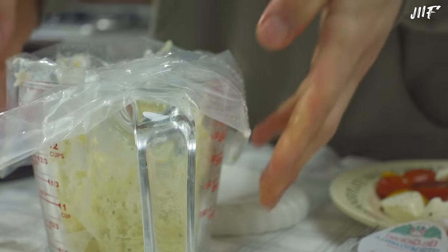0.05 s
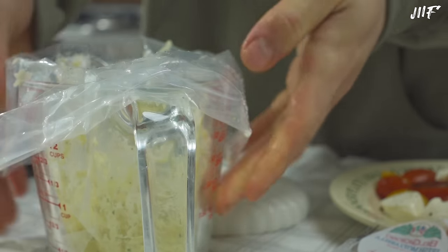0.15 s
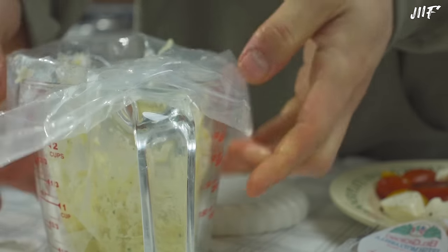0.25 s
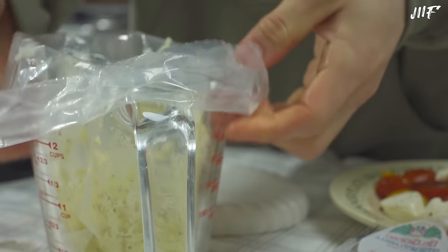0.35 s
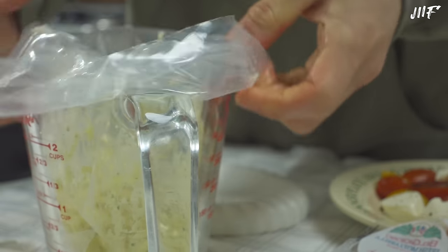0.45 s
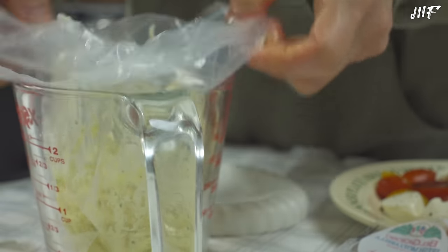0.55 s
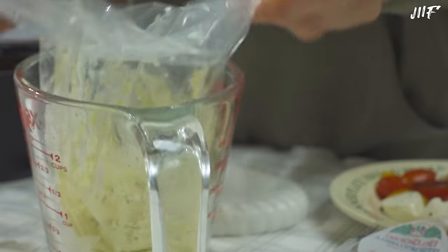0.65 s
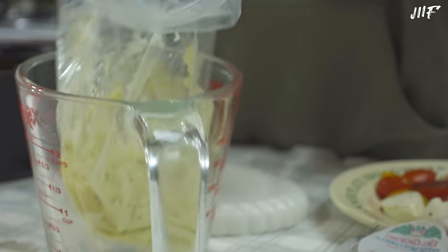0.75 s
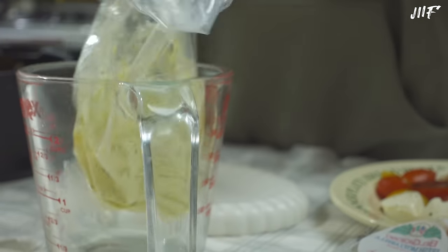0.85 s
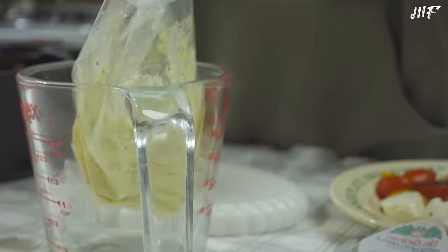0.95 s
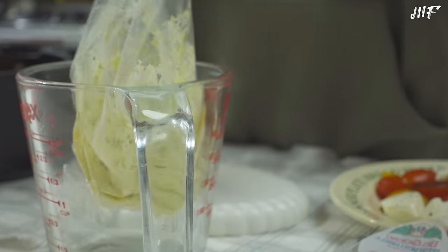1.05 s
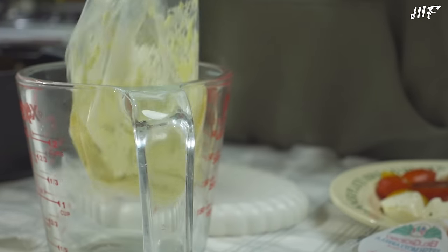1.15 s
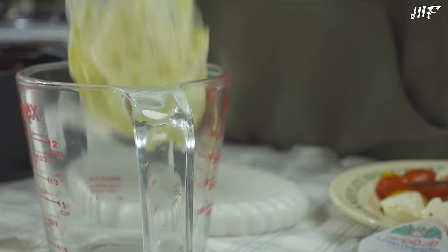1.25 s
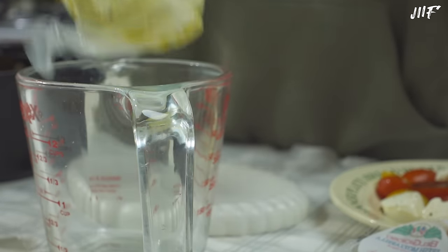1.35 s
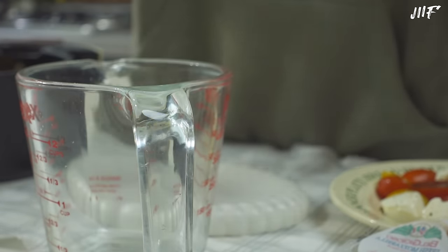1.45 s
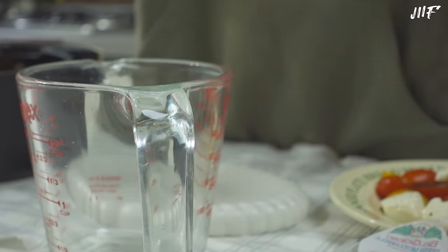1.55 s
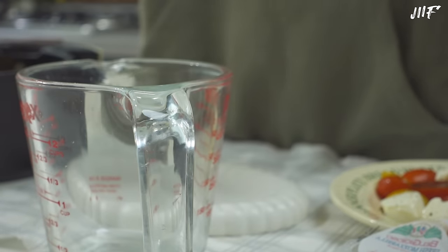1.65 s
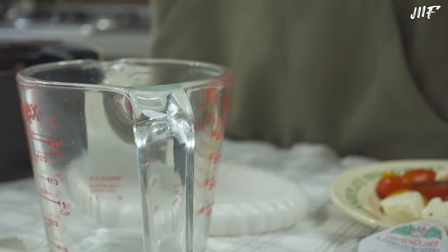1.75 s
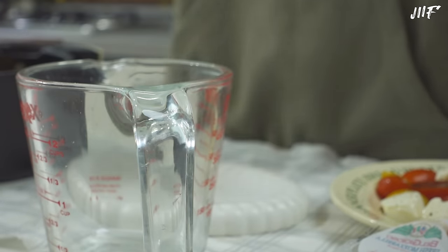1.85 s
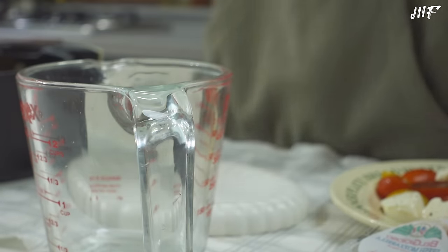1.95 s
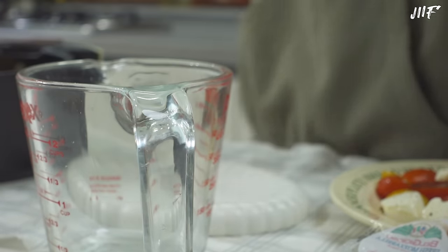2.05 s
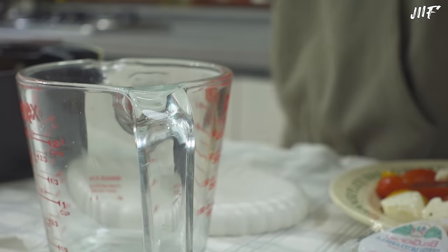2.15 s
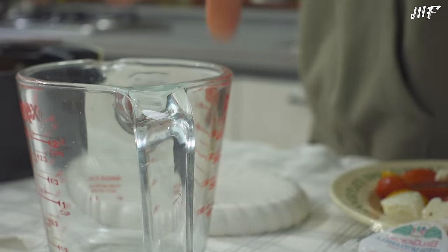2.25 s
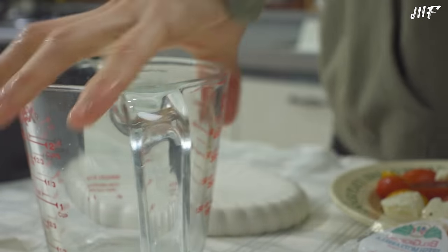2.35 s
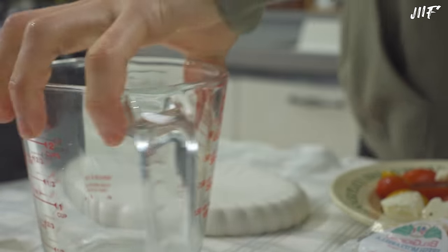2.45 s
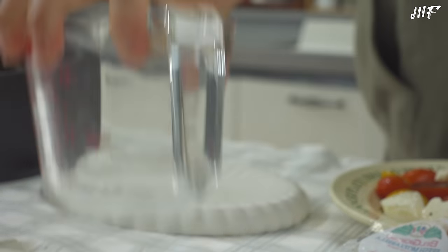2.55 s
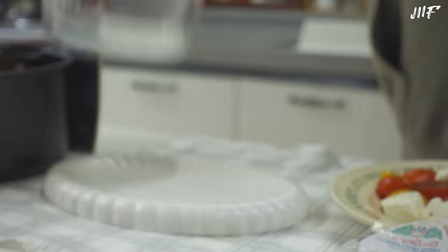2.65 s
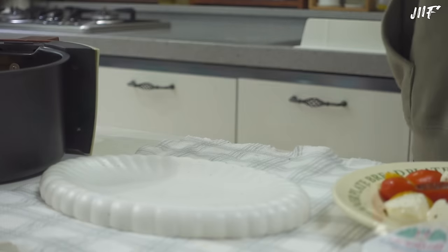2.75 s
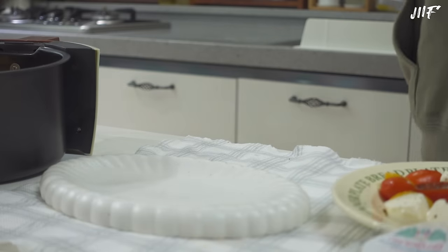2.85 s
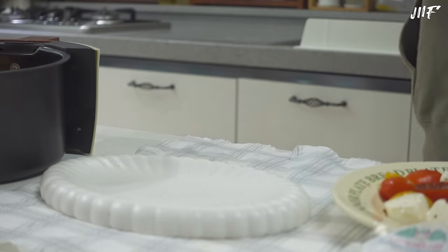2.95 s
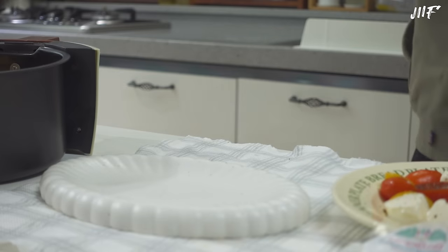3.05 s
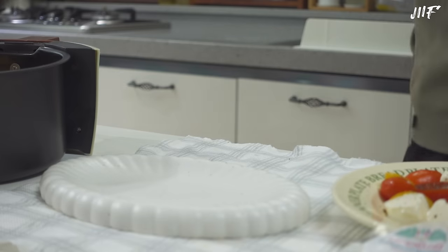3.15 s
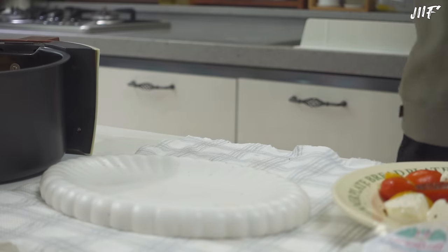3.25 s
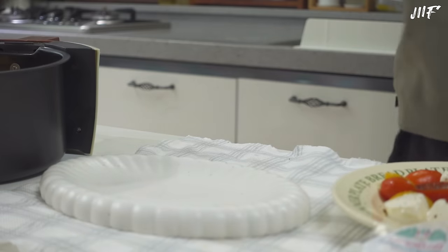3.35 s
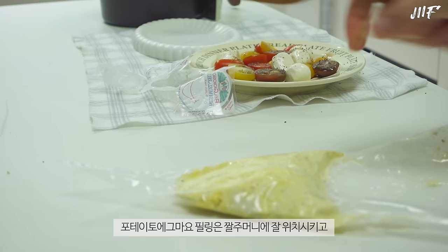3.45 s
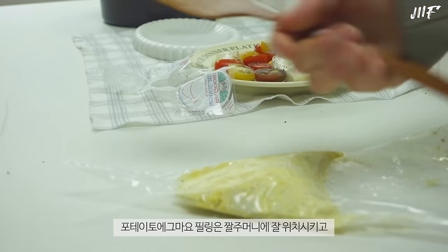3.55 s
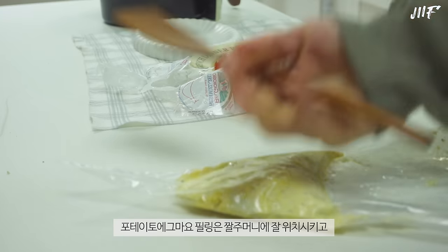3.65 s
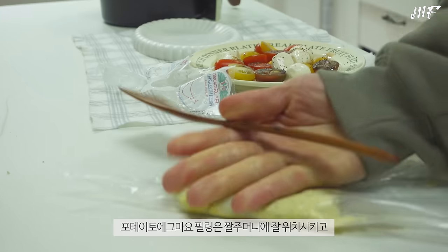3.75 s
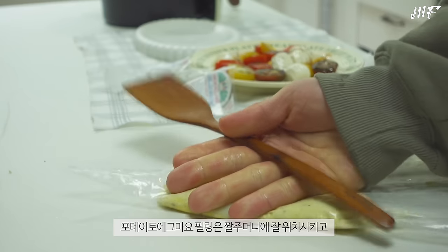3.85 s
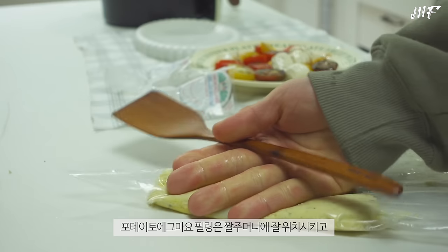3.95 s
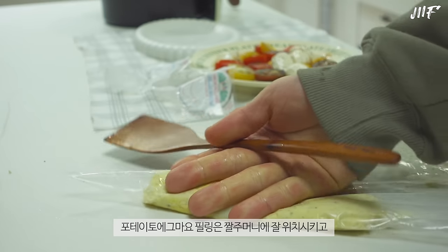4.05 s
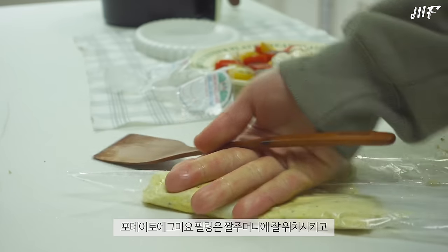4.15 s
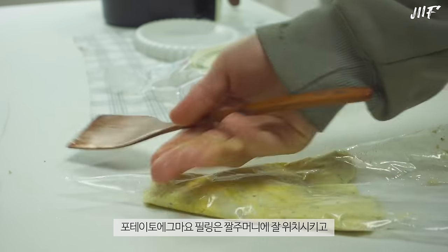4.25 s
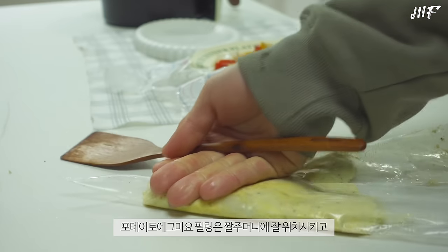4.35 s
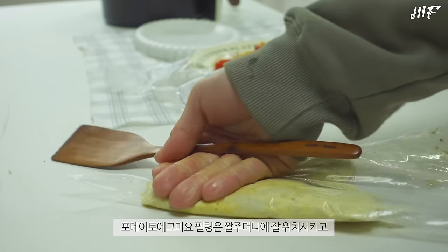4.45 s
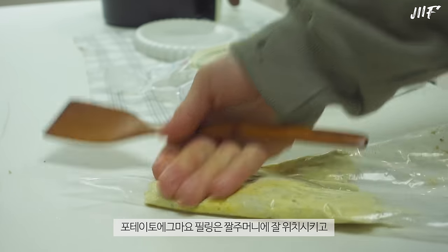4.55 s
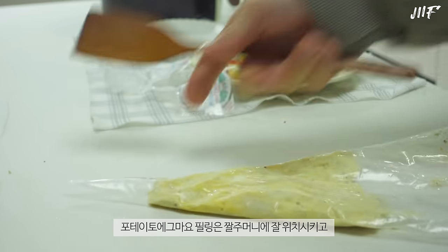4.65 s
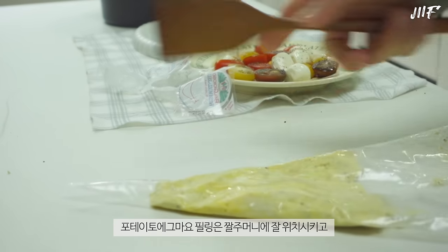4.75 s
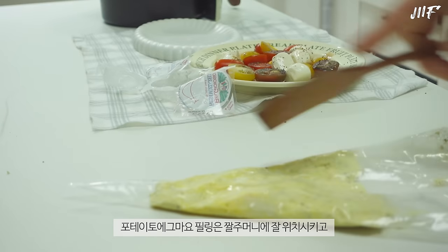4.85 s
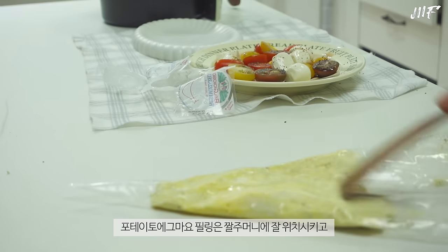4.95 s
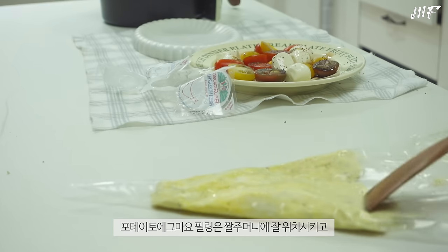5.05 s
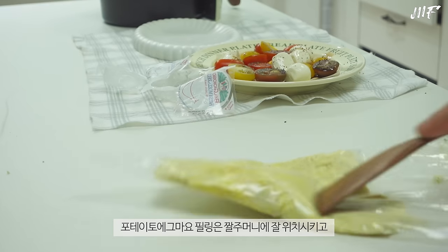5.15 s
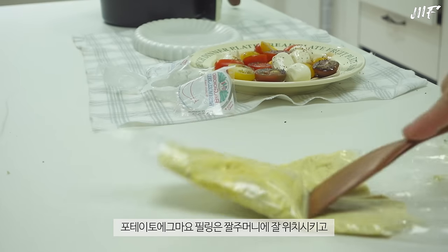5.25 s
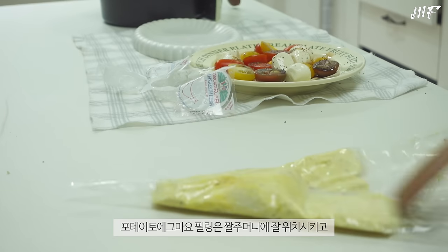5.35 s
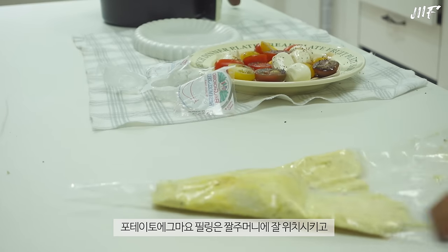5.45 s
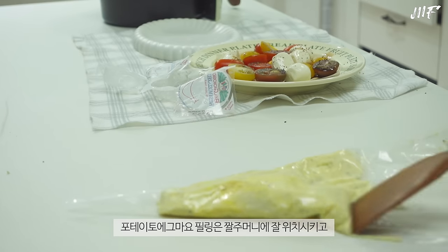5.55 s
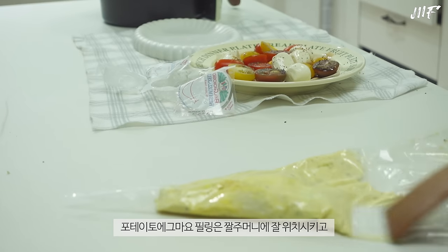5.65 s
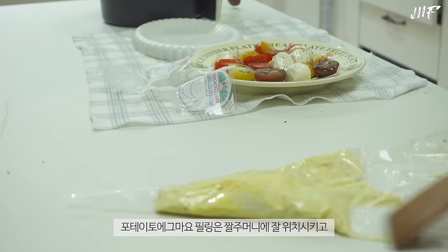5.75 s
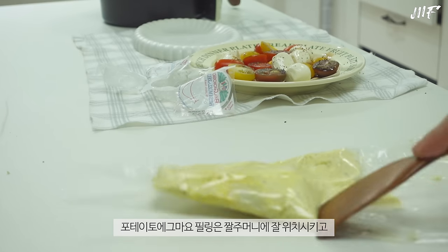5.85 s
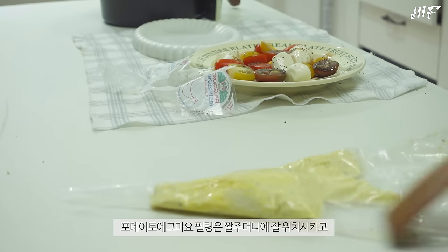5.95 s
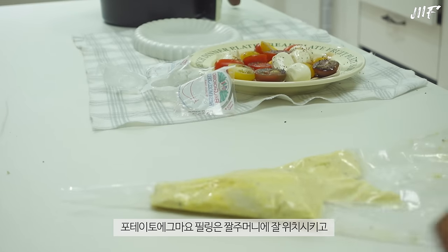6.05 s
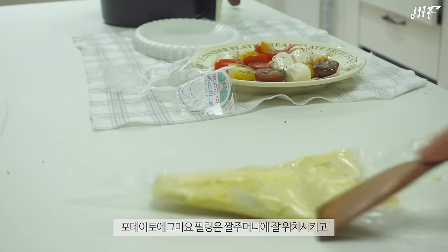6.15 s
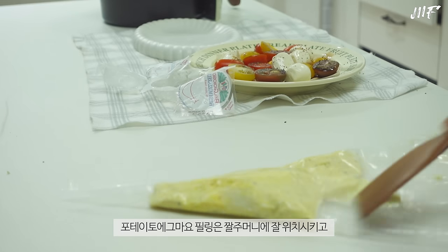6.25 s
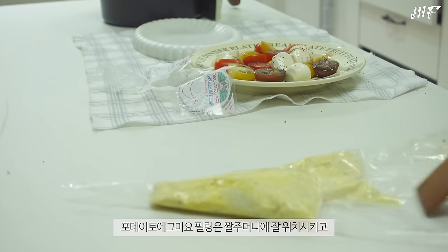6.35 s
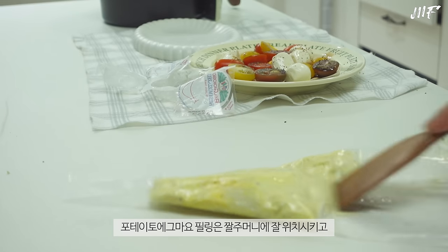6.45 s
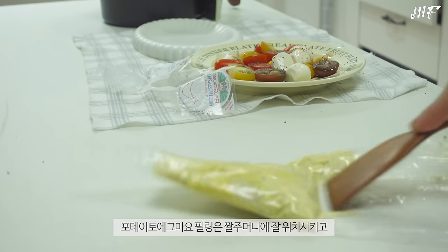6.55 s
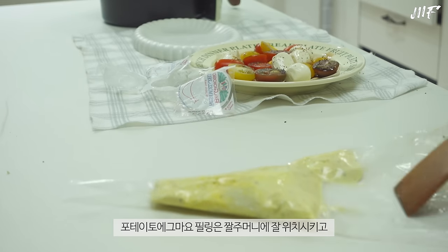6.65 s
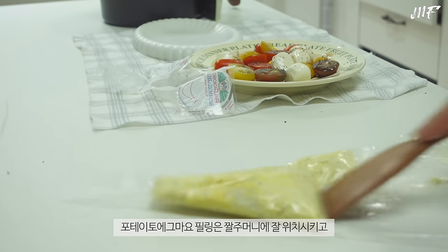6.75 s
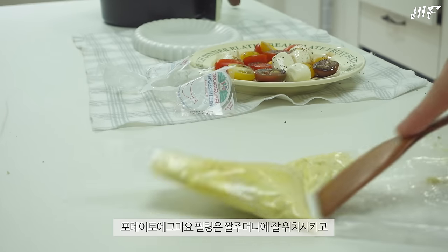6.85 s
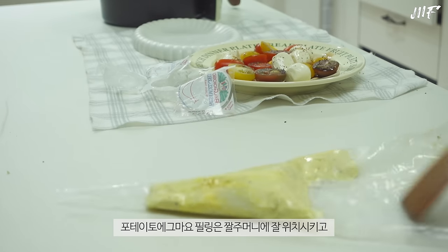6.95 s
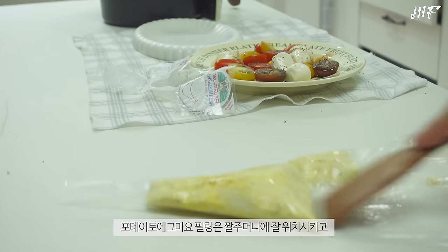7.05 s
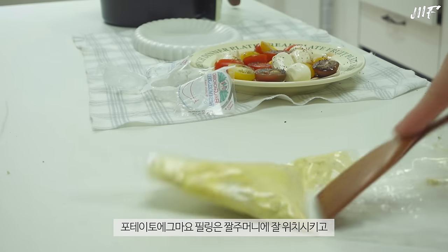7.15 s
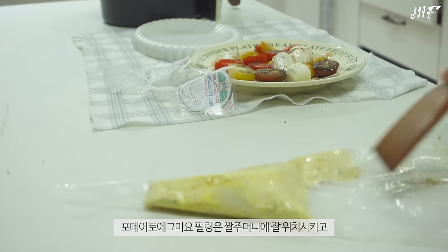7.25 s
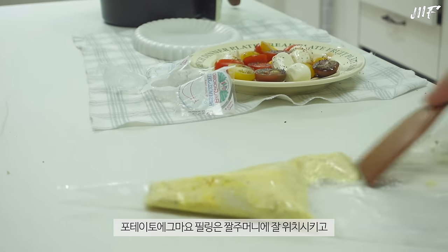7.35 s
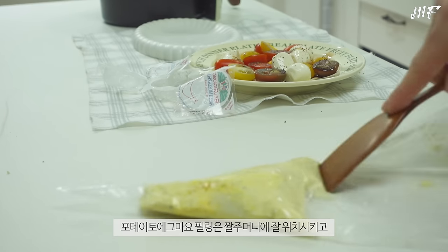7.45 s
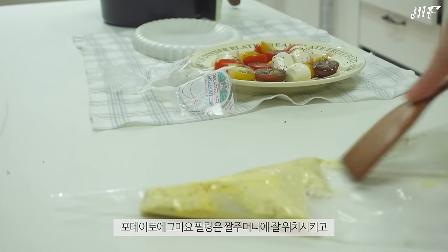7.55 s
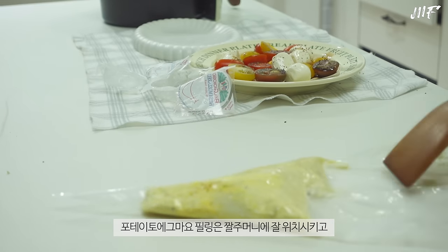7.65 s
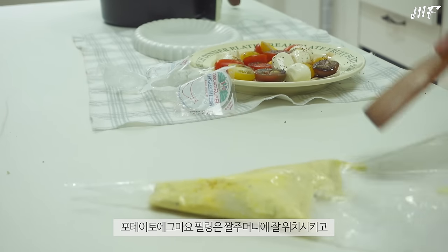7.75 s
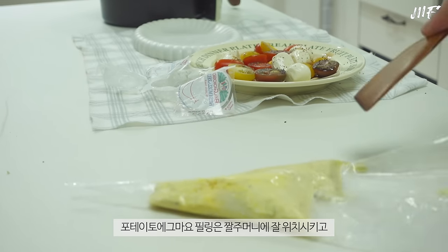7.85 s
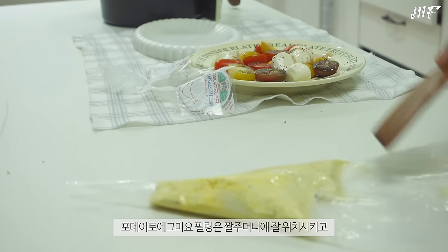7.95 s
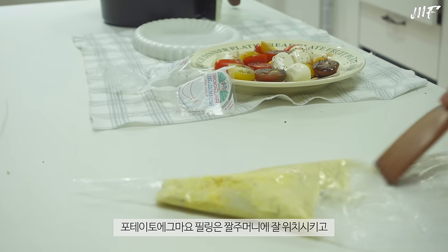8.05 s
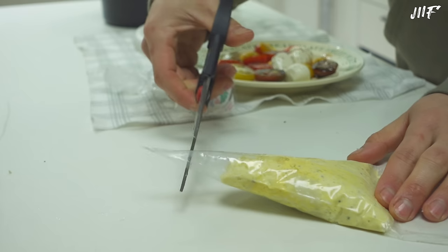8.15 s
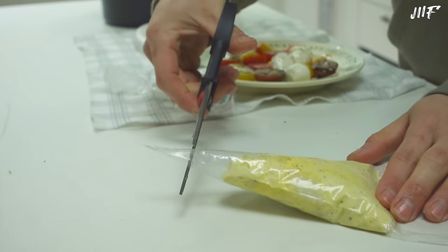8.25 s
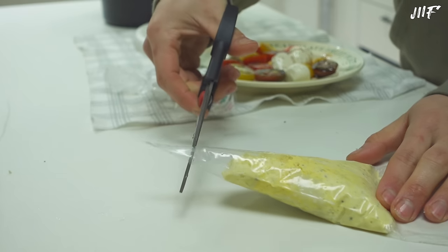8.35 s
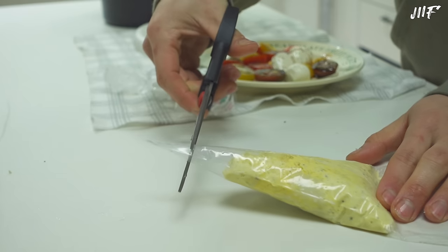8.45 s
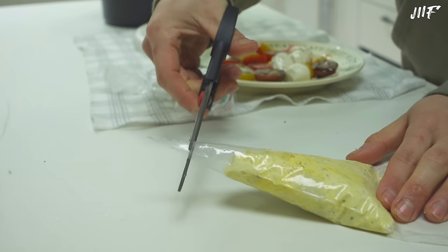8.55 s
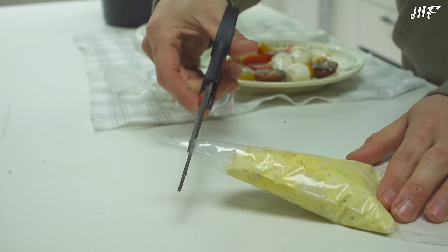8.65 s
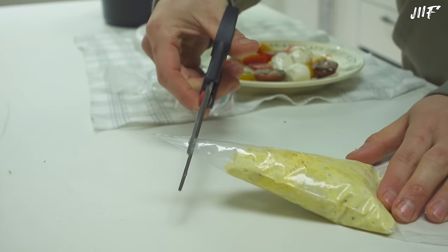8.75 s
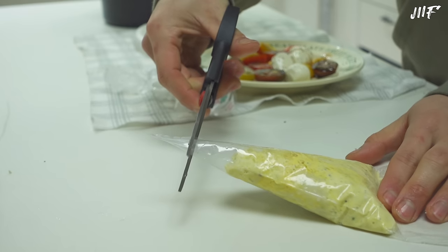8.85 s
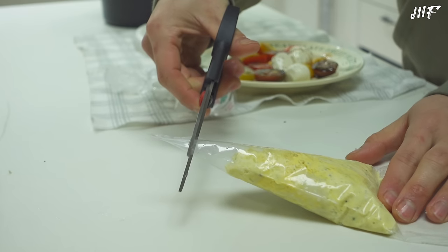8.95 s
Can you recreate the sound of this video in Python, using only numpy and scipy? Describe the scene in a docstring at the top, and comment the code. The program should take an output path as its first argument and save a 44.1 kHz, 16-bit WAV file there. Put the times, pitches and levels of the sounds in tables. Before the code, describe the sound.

In a small, lightly reverberant kitchen, a close microphone catches crisp film crackling and dull rubbing as a filled bag leaves a jug. A lull follows with a few lone ticks and a brief cloth swish. The bag then crinkles under a patting hand, and a spatula squeezes it along the table in separate rustling scrapes, tiny squeaky rasps and soft knocks, before near silence.

```python
"""Sharp snaps over a bed of fine crinkles: a thin plastic piping bag of soft filling leaves a glass jug.
A hand then pats it flat on a kitchen table and a wooden spatula pushes the filling in short strokes.
Snaps are short cracks with ringing facets; crinkles and rubs are clouds of tiny damped rings.
Padded knocks, narrow noise rasps, a cloth swish and a faint jug rub join in; noise tails make the small room."""
import sys
import numpy as np
from scipy import signal
from scipy.fft import rfft, irfft
from scipy.io import wavfile
from scipy.ndimage import map_coordinates

SR = 44100
rng = np.random.default_rng(int(sys.argv[2]) if len(sys.argv) > 2 else 0)


def master_out(mix):
    """Clip the mix to full scale and print it as 16-bit PCM to the path in sys.argv[1]."""
    frames = np.transpose(np.atleast_2d(mix))
    ceiling = np.clip(frames, -1, 1)
    pcm = np.round(ceiling * 32767).astype(np.int16)
    wavfile.write(sys.argv[1], SR, pcm)


N = 396900
TIME = np.arange(N) / SR

# Steady room hush. Each row: time in seconds, mid level in dB.
HUSH_LEVEL = [(0, -55.5), (2, -56.5), (4.8, -53.5), (8.2, -57), (9, -60)]
# Hush spectrum. Each row: frequency in Hz, relative density in dB.
HUSH_SPECTRUM = [(18, -64), (30, -28), (98, -46), (120, -9), (165, -13.5), (203, -10.5), (335, -9),
                 (413, -7), (459, -7), (551, -6), (612, 0), (907, -0.5), (1120, 1.5), (14600, -12.5),
                 (15800, -12)]
# The jug moves off the cloth. Each row: full force in seconds, rise in seconds, hold in seconds, level in dB.
JUG_STROKES = [(2.72, 0.18, 0.071, -60)]
# The sleeve sweeps past. Each row: full force in seconds, rise in seconds, hold in seconds, level in dB.
SLEEVE_STROKES = [(2.97, 0.2, 0.046, -41.5), (3.05, 0.12, 0.15, -48.5), (3.28, 0.19, 0.07, -46),
                  (3.386, 0.012, 0.064, -47)]
# Cloth spectrum. Each row: frequency in Hz, relative gain in dB.
CLOTH_SPECTRUM = [(530, -29), (900, -13), (1740, 3.5), (2410, 1), (2810, 1.5), (8170, 2.5), (14500, -6.5),
                  (15800, -8)]
# Modes of spatula on table top. Each row: frequency in Hz, width in Hz, relative level in dB.
TABLE_MODES = [(387, 22, 1), (479, 36, 0), (660, 60, -7), (867, 50, 0), (975, 45, -4), (1115, 32, 2),
               (1556, 45, -1)]
# Soft blows of bag, hand and spatula. Each row: time in seconds, relative peak in dB, pitch in Hz.
BLOWS = [(0.841, -21.5, 410), (0.941, -25, 474), (1.01, -24.5, 520), (4.296, -26, 1000), (5.06, -33, 825),
         (5.09, -30, 655), (5.503, -27.5, 440), (5.808, -24, 454), (6.143, -17.5, 457), (6.363, -29, 470),
         (6.421, -20, 510), (6.423, -13.5, 880), (6.714, -22, 510), (6.788, -30.5, 328), (7.002, -28, 490),
         (7.349, -10, 1020), (7.616, -21, 1190), (7.794, -27, 1360), (8.039, -24.5, 482)]
# Taut film slipping. Each row: start in seconds, rise in seconds, fall in seconds, pitch in Hz, level in dB.
FILM_RASPS = [(0.24, 0.048, 0.04, 8000, -44.5), (0.211, 0.07, 0.054, 1640, -51),
              (0.2, 0.051, 0.06, 4860, -50.5), (0.536, 0.0094, 0.02, 4160, -25),
              (1.16, 0.022, 0.025, 3540, -31), (2.325, 0.016, 0.043, 1890, -41.5),
              (4.129, 0.0017, 0.028, 9400, -33.5), (4.128, 0.004, 0.032, 4900, -24.5),
              (4.358, 0.002, 0.054, 4300, -23.5), (4.357, 0.0017, 0.069, 7900, -27.5),
              (4.955, 0.019, 0.025, 3670, -28), (5.333, 0.003, 0.049, 3300, -44),
              (5.464, 0.029, 0.028, 1700, -32), (5.799, 0.02, 0.025, 2330, -38),
              (6.094, 0.038, 0.037, 2640, -27.5), (6.135, 0.047, 0.039, 1790, -27.5),
              (6.447, 0.026, 0.028, 2740, -36), (6.727, 0.039, 0.04, 2617, -30),
              (7.015, 0.029, 0.023, 900, -37), (7.05, 0.034, 0.031, 2560, -30),
              (7.347, 0.0014, 0.038, 3160, -25), (8.087, 0.025, 0.025, 3000, -26.5)]
# Pulls out of the jug. Each row: full force in seconds, rise in seconds, hold in seconds,
# then relative levels in dB of dull rub, crinkle and fine fizz.
LIFT_STROKES = [(0.303, 0.035, 0.0067, -49, -38, -40), (0.365, 0.054, 0.015, -43, -32.5, -44),
                (0.435, 0.045, 0.015, -37.5, -35, -42), (0.545, 0.091, 0.044, -42, -33.5, -28),
                (0.652, 0.072, 0.017, -38.5, -31, -24.5), (0.75, 0.15, 0.066, -42, -34, -37),
                (0.845, 0.06, 0.11, -46.5, -32, -31), (1.01, 0.061, 0.0096, -57, -32, -26),
                (1.085, 0.033, 0.11, -42, -31, -28), (1.222, 0.068, 0.0055, -43.5, -27.5, -24)]
# The hand lays the bag down and pats it. Each row: full force in seconds, rise in seconds, hold in seconds,
# then relative levels in dB of dull rub, crinkle and fine fizz.
PAT_STROKES = [(2.17, 0.1, 0.14, -76, -57, -68), (2.333, 0.014, 0.027, -66, -57, -43.5),
               (2.505, 0.1, 0.14, -68, -59, -63.5), (3.743, 0.032, 0.0065, -54, -44, -39),
               (3.835, 0.09, 0.014, -57, -43.5, -51), (3.923, 0.18, 0.059, -49, -38, -54),
               (4.137, 0.035, 0.029, -43.5, -44, -40), (4.297, 0.0044, 0.0017, -51, -37, -36),
               (4.36, 0.0024, 0.047, -40, -28.5, -43), (4.571, 0.034, 0.038, -47, -38.5, -44)]
# Spatula strokes. Each row: full force in seconds, rise in seconds, hold in seconds,
# then relative levels in dB of dull rub, crinkle and fine fizz.
SCRAPE_STROKES = [(4.942, 0.046, 0.016, -55, -30.5, -41), (5.099, 0.03, 0.071, -46.5, -35.5, -35.5),
                  (5.415, 0.011, 0.009, -43, -36.5, -48), (5.494, 0.05, 0.066, -45, -33.5, -35.5),
                  (5.66, 0.089, 0.036, -48, -42.5, -42), (5.808, 0.073, 0.013, -35.5, -33.5, -36.5),
                  (5.998, 0.2, 0.01, -53, -39, -37), (6.118, 0.075, 0.047, -31.5, -27.5, -31),
                  (6.365, 0.0093, 0.013, -33, -34.5, -45), (6.424, 0.036, 0.056, -39, -29.5, -36.5),
                  (6.623, 0.13, 0.02, -53, -40, -41), (6.771, 0.13, 0.011, -37.5, -32, -36.5),
                  (7.078, 0.083, 0.01, -42, -32, -34), (7.349, 0.021, 0.069, -37, -33.5, -32.5),
                  (7.492, 0.15, 0.041, -42.5, -36.5, -45), (7.611, 0.062, 0.037, -43, -31, -34.5),
                  (7.713, 0.025, 0.015, -41, -34, -44), (8.012, 0.072, 0.14, -41, -31.5, -35.5)]
# Film spectrum in the jug. Each row: frequency in Hz, relative gain in dB.
JUG_SPECTRUM = [(59, -71), (100, -55), (153, -32), (259, -31), (314, -14.5), (356, -14.5), (593, 3),
                (849, -2.5), (1300, 1), (1860, 6.5), (3090, 2), (4820, -3.5), (5960, -7.5), (14200, -18),
                (15800, -16)]
# Film spectrum on the table. Each row: frequency in Hz, relative gain in dB.
TABLE_SPECTRUM = [(59, -57), (100, -54), (380, -15.5), (748, -6), (814, 2), (944, -11), (1190, -1),
                  (1380, -2), (4430, -3), (6630, -9), (8190, -8.5), (15800, -32)]
# Film spectrum under the spatula. Each row: frequency in Hz, relative gain in dB.
SPATULA_SPECTRUM = [(59, -56), (100, -31.5), (185, -20), (301, -17), (380, -7), (413, -6), (479, -3.5),
                    (717, -4), (868, 2.5), (1190, -1.5), (1570, 3), (3160, 2), (8550, -6), (15800, -15)]
# Loudest and lone creases buckling. Each row: time in seconds, level over 2 ms in dB, pitch in Hz,
# room answer in dB relative to the crack.
CREASE_SNAPS = [(0.3043, -14, 6980, -8), (0.3585, -21.5, 4280, 2.5), (0.3945, -21, 3200, -18),
                (0.4163, -16.5, 4650, -4.5), (0.453, -19, 5330, -10), (0.4752, -13.5, 4220, -13),
                (0.4845, -14, 5020, -8.5), (0.5492, -14, 5040, -21), (0.609, -13, 7160, -13),
                (0.6163, -14, 5300, 0), (0.7367, -14, 5796, -5.5), (0.7772, -14.5, 5740, -4.5),
                (0.8182, -14.5, 8500, -14), (0.8408, -12.5, 4040, -1.5), (0.8649, -10.5, 5150, -4),
                (0.895, -10.5, 5450, -6), (0.987, -14, 4300, -23), (1.0306, -22.5, 4940, -16),
                (1.0909, -13.5, 4670, -20), (1.1096, -17, 5500, -5), (1.1309, -22, 3770, -1),
                (1.1593, -22, 5400, -8), (1.1768, -13, 6100, -14), (1.1875, -17, 3870, -15),
                (1.202, -18, 3650, -8), (1.2525, -17, 2880, -22), (1.457, -19, 4370, -9.5),
                (1.7864, -25, 5100, -9.5), (2.0274, -35.5, 4800, -8), (2.0936, -25.5, 3770, -6),
                (2.0986, -33.5, 2140, -2), (2.3133, -37, 4970, 1), (2.332, -32.5, 2140, 7.5),
                (3.52, -33, 2350, -1.5), (3.7213, -29, 3160, -4), (3.7395, -20, 3120, -2),
                (3.756, -20.5, 6000, -13), (3.819, -22.5, 5400, -6.5), (3.8399, -23, 2360, -19),
                (3.8891, -18.5, 4620, -7.5), (3.9166, -23, 2280, -17), (3.947, -15.5, 2690, -20),
                (3.9605, -24, 2280, -9), (4.0552, -16, 4080, -3), (4.1283, -13.5, 6300, -1.5),
                (4.2431, -16, 4300, -6), (4.2999, -18, 2580, -24), (4.3374, -25, 2840, -23),
                (4.3585, -14.5, 5000, 1.5), (4.5686, -22, 6600, -16), (4.5981, -19.5, 2630, -3.5),
                (4.8846, -34.5, 2820, -6), (4.9196, -20, 2930, -12), (4.9312, -27, 2260, 4),
                (4.9561, -18.5, 4230, -4), (4.9775, -15.5, 3900, -2.5), (5.0632, -24.5, 2800, -10),
                (5.0949, -16.5, 3080, 1.5), (5.1222, -15.5, 3100, -16), (5.141, -18.5, 4200, -15),
                (5.172, -20, 3780, -13), (5.1924, -15.5, 4760, -2.5), (5.3322, -28, 3870, -6),
                (5.413, -23.5, 3070, -0.5), (5.5024, -14.5, 4280, -3), (5.5298, -14.5, 2980, -14),
                (5.56, -14, 4800, -4.5), (5.71, -17, 8920, -1), (5.957, -23, 2660, -14),
                (6.004, -22, 3303, -8), (6.1705, -14, 2350, -19.5), (6.2766, -27.5, 4630, -3.5),
                (6.3541, -17.5, 4930, -2), (6.364, -14.5, 1950, -1.5), (6.4738, -24, 2800, 2.5),
                (6.6205, -23.5, 3920, -1.5), (6.8283, -25.5, 4400, 0), (6.919, -23, 4440, -6.5),
                (6.97, -27.5, 3660, -14), (7.0807, -17, 6950, -5), (7.2129, -33.5, 5270, -1),
                (7.3245, -29, 3040, -4), (7.3473, -16, 2370, -3), (7.378, -16, 5490, -3.5),
                (7.4221, -20, 6100, 0.5), (7.4369, -17.5, 3270, -10), (7.607, -14, 5000, -3),
                (7.7065, -20, 4950, -1), (7.7945, -18, 3270, -13.5), (7.957, -22, 3030, 0),
                (7.9868, -16, 2620, -4), (8.0212, -14, 6940, 0.5), (8.051, -15, 3800, -6),
                (8.0697, -16.5, 5100, -0.5), (8.2065, -24, 4360, -5), (8.421, -37.5, 2620, 0.5)]

BREAK_OFF_S, TOP_HZ = 8.143, 16000  # time at which the bag sounds drop abruptly; band limit
RISE_DB = 20  # climb per rise time
RELEASE_DB_PER_S = 372
CREEP_DB, CREEP_FADE_DB_PER_S = -17, 84.5  # film settling after a stroke, relative to it
# Lesser creases: base level under a firm stroke, base pitch, their scatter, room answer
SMALL_SNAP_BASE_DB, SMALL_SNAP_SPREAD_DB = -25, 2.5
SMALL_SNAP_BASE_HZ, SMALL_SNAP_SPREAD_OCTAVES, SMALL_SNAP_WET_DB = 3350, 0.33, -17
BUCKLE_ABOVE_DB = -57  # gentler crinkling flips no crease
FIRM_DB, SNAP_DB_PER_CRINKLE_DB = -33.5, 0.84  # firm-stroke crinkle level; growth of snaps with it


def amp(db):
    """Decibels to gain."""
    return 10 ** (np.asarray(db) / 20)


def unit(x):
    """Scale to rms 1."""
    return x / np.sqrt(np.mean(x ** 2) + 1e-20)


def add(track, s, sound):
    """Mix a sound into a track at time s."""
    part = track[..., max(round(s * SR), 0):][..., :sound.shape[-1]]
    part += sound[..., :part.shape[-1]]


def stereo(mid, side):
    """Left and right from mid and side."""
    return np.array([mid + side, mid - side])


def band(x, lo_hz, hi_hz, order=2):
    """Band-pass."""
    edges_hz = [lo_hz, min(hi_hz, SR / 2 - 1)]
    return signal.sosfilt(signal.butter(order, edges_hz, "band", fs=SR, output="sos"), x)


def coloured(x, spectrum, size=4096):
    """Minimum-phase filter through (Hz, dB) points, so that clicks keep their sharp front."""
    hz, db = np.transpose(spectrum)
    bins_hz = np.fft.rfftfreq(size, 1 / SR)
    gain = amp(np.interp(np.log(bins_hz + 1), np.log(hz), db))
    cepstrum = irfft(np.log(np.maximum(gain, 1e-5)))
    # folding the cepstrum makes the filter causal
    cepstrum[1:size // 2] *= 2
    cepstrum[size // 2 + 1:] = 0
    impulse = irfft(np.exp(rfft(cepstrum)))
    return signal.oaconvolve(x, impulse)[:len(x)]


def clumps(rate_hz, depth_db):
    """A smooth random gain: wrinkles give way in small avalanches."""
    knots = rng.standard_normal(int(N * rate_hz / SR) + 4)
    return unit(amp(depth_db * map_coordinates(knots, [TIME * rate_hz])))


def grains(lo_hz, hi_hz, per_s, t60_s, spread_db):
    """Tiny damped rings at random times, each with its own pitch and size; rms 1."""
    when, pitch, size = rng.random((int(per_s * N / SR), 3)).T[:, :, None]
    t = np.arange(int(t60_s * SR)) / SR
    strength = amp(-spread_db * np.log(size + 0.012))  # few large, many small
    hz = lo_hz + pitch * (hi_hz - lo_hz)
    rings = strength * amp(-60 * t / t60_s) * np.sin(2 * np.pi * hz * t)
    at = (when * N).astype(int) + np.arange(len(t))
    cloud = np.bincount(at.ravel(), rings.ravel(), N)[:N]
    return unit(band(cloud, lo_hz, hi_hz))


def room(x, t60_s=0.44, side_db=-12, build_s=0.00036):
    """A fresh, nearly mono tail of the kitchen's hard walls, about as strong as the sound that feeds it."""
    t = np.arange(SR // 2) / SR
    envelope = amp(-60 * t / t60_s) * (1 - np.exp(-(t / build_s) ** 2))
    tail = rng.standard_normal((2, len(t))) * envelope
    tail /= np.linalg.norm(tail[0])
    mid, side = signal.oaconvolve(x[None], tail, axes=1)[:, :len(x)]
    return stereo(mid, amp(side_db) * side)


def in_room(x, wet_db):
    """The direct sound plus its room tail."""
    return x + amp(wet_db) * room(x)


def strokes(rows, creep_db=-120):
    """One gain curve per dB column: each stroke swells, holds and lets go, and a quiet creep may linger."""
    power = np.zeros((len(rows[0]) - 3, N // 32 + 1))
    t = np.linspace(0, N / SR, power.shape[1])
    for s, rise_s, hold_s, *levels_db in rows:
        before_s = np.maximum(s - t, 0)
        after_s = np.maximum(t - s - hold_s, 0)
        release_db = -RELEASE_DB_PER_S * after_s
        settling_db = creep_db - CREEP_FADE_DB_PER_S * after_s
        shape_db = np.maximum(release_db, settling_db) - RISE_DB * before_s / rise_s
        power += amp(np.array(levels_db)[:, None] + shape_db) ** 2
    return [np.interp(TIME, t, np.sqrt(p)) for p in power]


def room_tone():
    """The steady hush of the kitchen: shaped noise, wide but stronger in the middle."""
    mid, side = (unit(coloured(rng.standard_normal(N), HUSH_SPECTRUM)) for _ in range(2))
    level = amp(np.interp(TIME, *np.transpose(HUSH_LEVEL)))
    return level * stereo(mid, amp(-5.5) * side)


def jug():
    """The jug is taken off the cloth with a faint hollow rub of narrow-band noise."""
    rub = unit(band(rng.standard_normal(N), 500, 730))
    return in_room(strokes(JUG_STROKES)[0] * rub, wet_db=-8)


def sleeve():
    """Cloth fibres brush past each other in a soft, bright swish, heard mostly by way of the walls."""
    rough = rng.standard_normal(N) * amp(3.7 * rng.standard_normal(N))
    fibres = coloured(rough, CLOTH_SPECTRUM)
    return strokes(SLEEVE_STROKES)[0] * unit(in_room(fibres, wet_db=14))


def table_ring(hz=800, octaves=4):
    """Impulse response of spatula and table top; modes near hz are driven hardest."""
    t = np.arange(SR // 4) / SR
    ring = np.zeros(len(t))
    for mode_hz, width_hz, db in TABLE_MODES:
        drive = amp(db + rng.normal(0, 0.98)) * np.exp(-(np.log2(mode_hz / hz) / octaves) ** 2)
        decay = np.exp(-np.pi * width_hz * t)
        ring += drive * width_hz * decay * np.cos(2 * np.pi * mode_hz * t)
    return band(ring, 315, 3000)


def knocks(thud_share=0.84, thud_t60_s=0.061, attack_s=0.0021):
    """Each blow is a thud padded by the soft filling, with a short ring of the table."""
    out, t = np.zeros(N), np.arange(SR // 4) / SR
    envelope = amp(-60 * t / thud_t60_s) * (1 - np.exp(-t / attack_s))
    for s, db, hz in BLOWS:
        push = rng.standard_normal(len(t)) * envelope
        thud = band(band(push, 0.97 * hz, 1.32 * hz, order=1), 180, 3500)
        blow = unit(table_ring(hz, octaves=0.34)) + thud_share * unit(thud)
        add(out, s + 0.00094, amp(db - 2) * blow / np.abs(blow).max())
    return in_room(out, wet_db=-5.0)


def rasps(width=0.04):
    """Irregular slips drive one narrow resonance of the stretched film for a moment."""
    out, t = np.zeros(N), np.arange(SR // 5) / SR
    for s, rise_s, fall_s, hz, db in FILM_RASPS:
        ramp = np.interp(t, [0, rise_s, rise_s + fall_s], [0, 1, 0])
        swell = np.sin(np.pi / 2 * ramp) ** 2
        slips = rng.standard_normal(len(t)) ** 3  # cubing makes them spiky
        ring = band(slips, hz * (1 - width), hz * (1 + width), order=1) * swell
        add(out, s, amp(db) * ring * np.linalg.norm(swell) / np.linalg.norm(ring))
    return in_room(out, wet_db=-3.5)


def film(rows, spectrum, rub, rub_db, crinkle_db, fizz_db):
    """Moving film: a dull rub, mid-sized wrinkles and the fizz of the smallest ones."""
    rubbing, crinkling, fizzing = strokes(rows, CREEP_DB)
    bursts = clumps(rate_hz=80, depth_db=2.5)
    wrinkles = bursts * grains(986, 4080, per_s=1000, t60_s=0.0058, spread_db=2.0)
    fizz = bursts * grains(4140, 16400, per_s=1500, t60_s=0.0013, spread_db=5.3)
    dull = rubbing * amp(rub_db) * unit(coloured(rub, spectrum))
    middle = crinkling * amp(crinkle_db) * unit(coloured(wrinkles, spectrum))
    fine = fizzing * amp(fizz_db) * unit(coloured(fizz, spectrum))
    return dull + middle + fine


def handling():
    """The bag drags over glass, is set down and patted, then squeezed against the table by the spatula."""
    slips = unit(band(grains(108, 1114, per_s=700, t60_s=0.0047, spread_db=4.5), 105, 1840))
    # the sticking and slipping blade shakes the table top
    shaken = unit(signal.oaconvolve(slips, table_ring())[:N])
    lift = film(LIFT_STROKES, JUG_SPECTRUM, slips, rub_db=3.0, crinkle_db=-2.0, fizz_db=-3.6)
    pat = film(PAT_STROKES, TABLE_SPECTRUM, slips, rub_db=1.5, crinkle_db=1.0, fizz_db=2.0)
    blade_rub = slips + 0.24 * shaken
    scrape = film(SCRAPE_STROKES, SPATULA_SPECTRUM, blade_rub, rub_db=0.0, crinkle_db=1.0, fizz_db=1.5)
    return in_room(lift + pat + scrape, wet_db=-4.5)


def buckle(hz, t, scatter=0.474, ring_t60_s=0.0064, crack=0.85, crack_t60_s=0.001, reach=3.36, count=8):
    """A crease flips with a one-cycle crack; the facets around it ring briefly, the large low ones longest."""
    spacing = np.linspace(-1.8, 1.6, count) + rng.normal(0, 0.27, count)
    ratio = np.exp(scatter * spacing)[:, None]
    phase = rng.uniform(0, 2 * np.pi, (count, 1))
    facet_hz = np.minimum(hz * ratio, TOP_HZ)
    facets = np.sin(2 * np.pi * facet_hz * t + phase) * amp(-60 * t * ratio ** 0.12 / ring_t60_s)
    nearness = np.exp(-np.abs(np.log(ratio)))
    ring = np.sum(facets * nearness, axis=0) / np.sqrt(count)
    flip = crack * np.cos(2 * np.pi * hz * t) * amp(-60 * t / crack_t60_s)
    return band(ring + flip, 500 + 0.086 * hz, min(reach * hz, 20000))


def snaps(rows, pan_db=0.3, lag_samples=0.3, blend_t60_cycles=3.47):
    """One face of each crease points at the listener, a little off centre; the walls get a broad blend."""
    out, t = np.zeros((2, N)), np.arange(SR // 50) / SR
    sides = np.array([[1], [-1]])
    for s, db, hz, wet_db in rows:
        size = amp(db) * np.sqrt(0.002 * SR)  # energy over 2 ms
        near = buckle(hz, t)
        tone = np.cos(2 * np.pi * 0.86 * hz * t)
        blend = band(tone * amp(-60 * t * hz / blend_t60_cycles), 610, 20000)
        angle = rng.standard_normal()
        # the gradient term is a sub-sample shift between the ears
        shifted = near + sides * angle * lag_samples / 2 * np.gradient(near)
        direct = amp(pan_db * angle * sides) * shifted
        add(out, s, size * direct / np.linalg.norm(near))
        to_walls = np.pad(blend / np.linalg.norm(blend), (0, SR // 2))
        add(out, s, size * amp(wet_db) * room(to_walls))
    return out


def small_snaps(action, per_s, gain_db, pitch_ratio):
    """Rows for lesser creases: they flip at random moments, louder the harder the film is worked."""
    crinkling = strokes(action, CREEP_DB)[1]
    draws = rng.uniform(-1, 1, (int(per_s * N / SR), 3)) * np.sqrt(3)  # unit deviation
    rows = []
    for k, (late, size, pitch) in enumerate(draws):
        s = (k + late / 2) / per_s
        force_db = 20 * np.log10(crinkling[int(np.clip(s * SR, 0, N - 1))] + 1e-9)
        if force_db > BUCKLE_ABOVE_DB:
            growth_db = SNAP_DB_PER_CRINKLE_DB * (force_db - FIRM_DB)
            db = SMALL_SNAP_BASE_DB + gain_db + growth_db + SMALL_SNAP_SPREAD_DB * size
            hz = pitch_ratio * SMALL_SNAP_BASE_HZ * 2 ** (SMALL_SNAP_SPREAD_OCTAVES * pitch)
            rows.append((s, db, hz, SMALL_SNAP_WET_DB))
    return rows


def crackle():
    """The hanging bag crackles most and brightest; under hand and spatula fewer creases are free to flip."""
    hanging = small_snaps(LIFT_STROKES, per_s=46, gain_db=2.5, pitch_ratio=1.115)
    patted = small_snaps(PAT_STROKES, per_s=20, gain_db=-1, pitch_ratio=0.79)
    scraped = small_snaps(SCRAPE_STROKES, per_s=34, gain_db=-0.5, pitch_ratio=0.99)
    return snaps(hanging + patted + scraped)


def scene():
    """All sources; at BREAK_OFF_S the bag sounds drop abruptly by 20.5 dB, room tail and all; two snaps follow."""
    around = room_tone() + jug() + sleeve()
    early_snaps = snaps([row for row in CREASE_SNAPS if row[0] < BREAK_OFF_S])
    late_snaps = snaps([row for row in CREASE_SNAPS if row[0] >= BREAK_OFF_S])
    working = knocks() + rasps() + handling() + crackle() + early_snaps
    bag = working * np.where(TIME < BREAK_OFF_S, 1, amp(-20.5)) + late_snaps
    return bag * amp([[-0.15], [0.15]]) + around  # bag slightly right


def record(dry):
    """The microphone sheds deep bass, peaks are rounded near full scale, and the band limit cuts the top."""
    lean = signal.sosfilt(signal.butter(2, 70, "high", fs=SR, output="sos"), dry)
    rounded = lean / (1 + np.abs(lean / 0.9) ** 8) ** (1 / 8)
    kept = np.fft.rfftfreq(N, 1 / SR) < TOP_HZ
    return irfft(rfft(rounded) * kept, N)


dry = scene()
out = record(dry)
master_out(out)
```